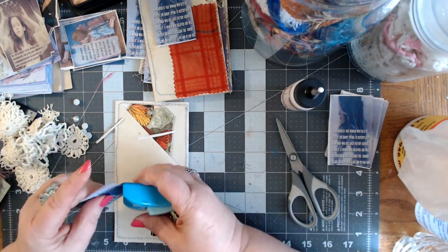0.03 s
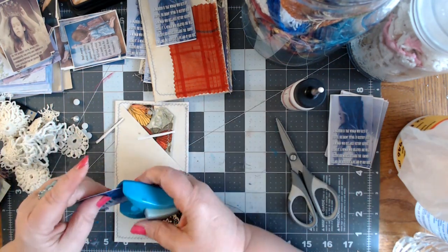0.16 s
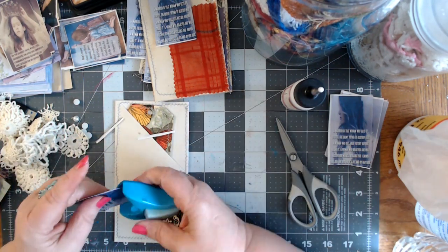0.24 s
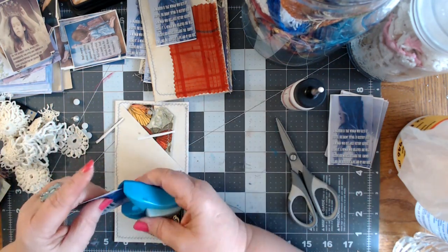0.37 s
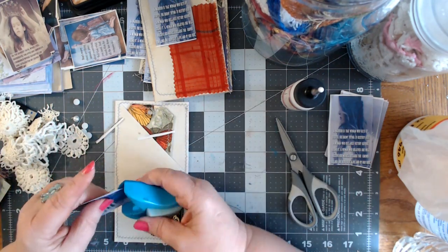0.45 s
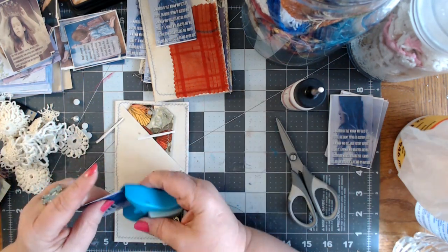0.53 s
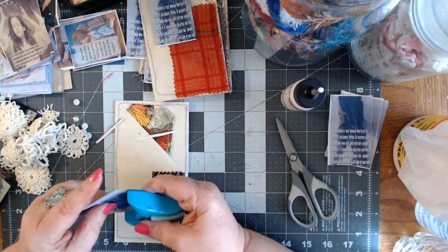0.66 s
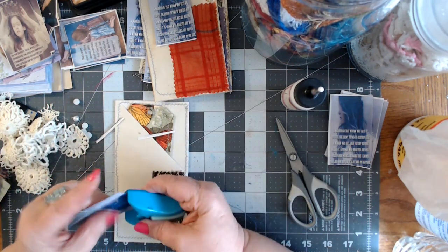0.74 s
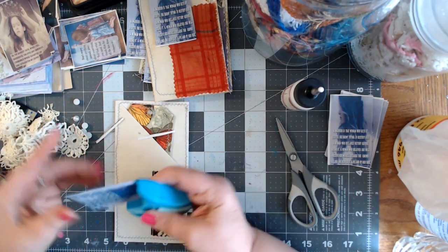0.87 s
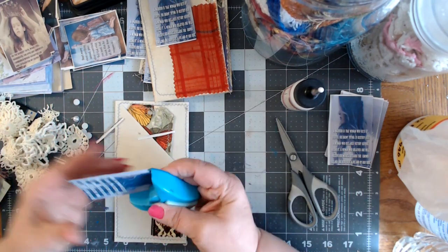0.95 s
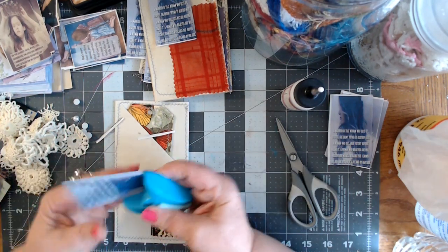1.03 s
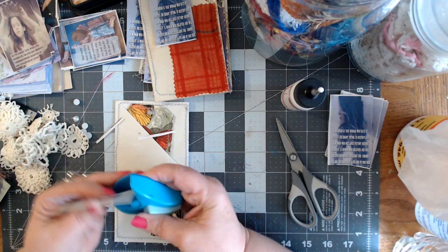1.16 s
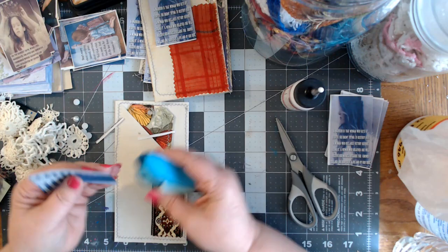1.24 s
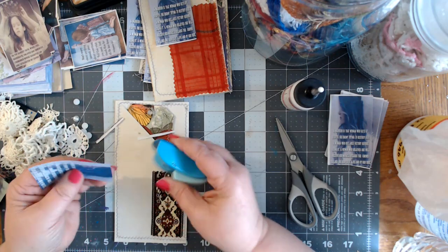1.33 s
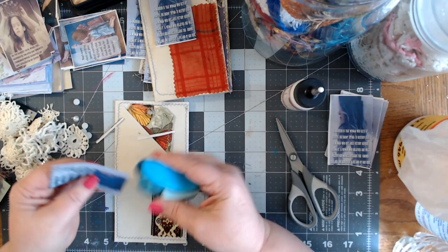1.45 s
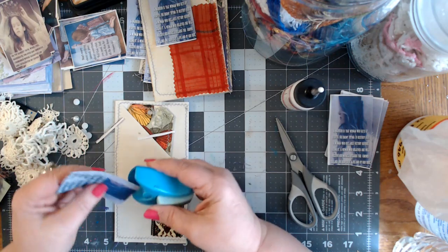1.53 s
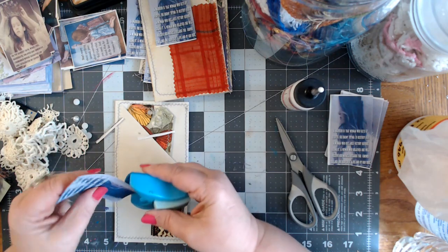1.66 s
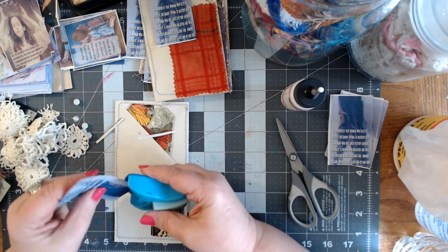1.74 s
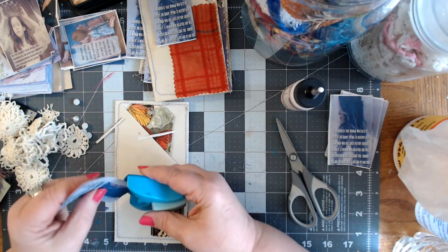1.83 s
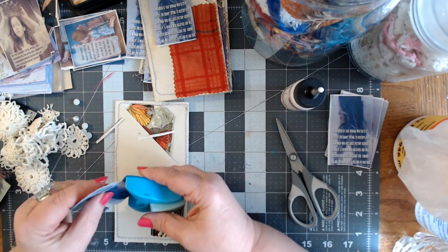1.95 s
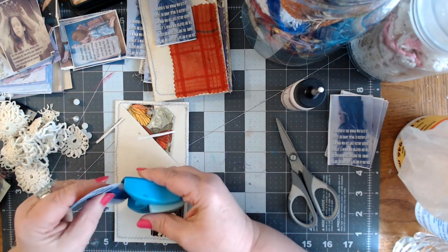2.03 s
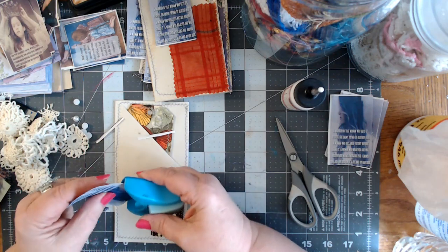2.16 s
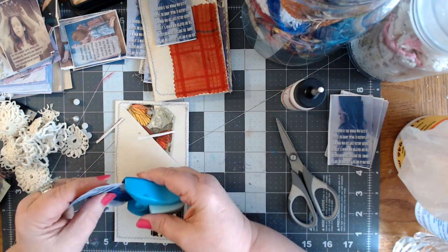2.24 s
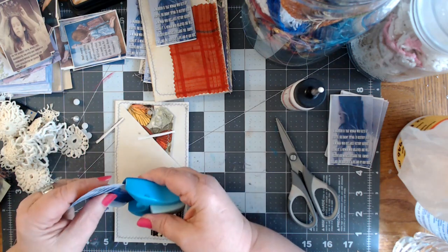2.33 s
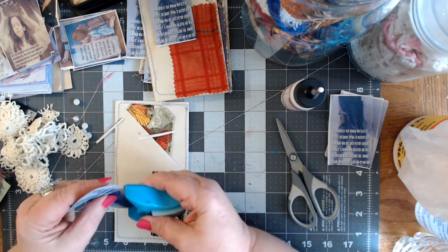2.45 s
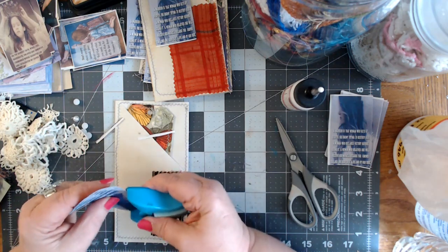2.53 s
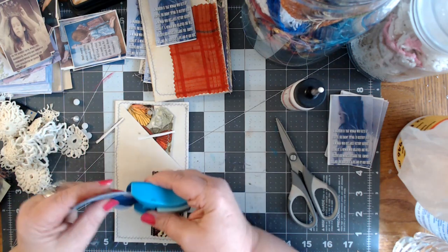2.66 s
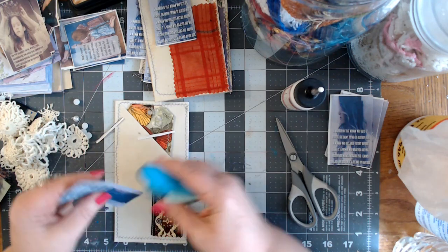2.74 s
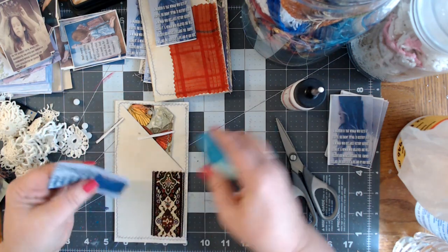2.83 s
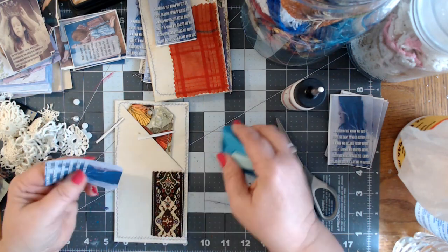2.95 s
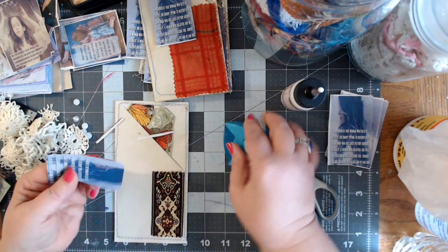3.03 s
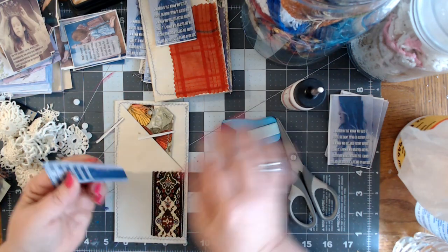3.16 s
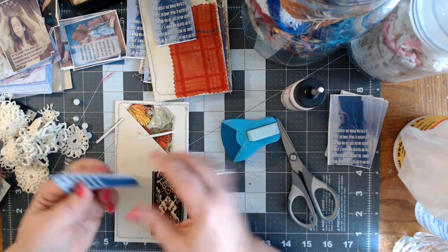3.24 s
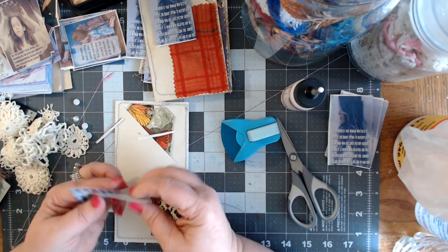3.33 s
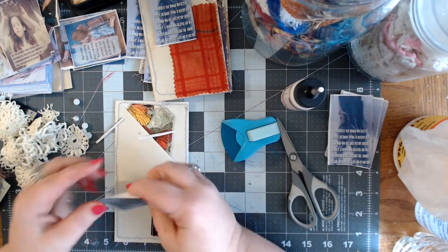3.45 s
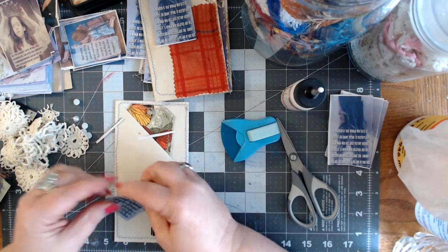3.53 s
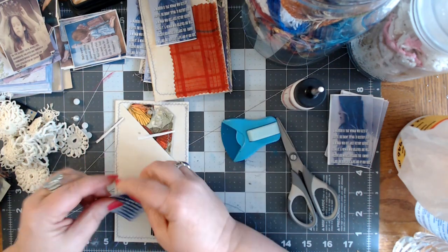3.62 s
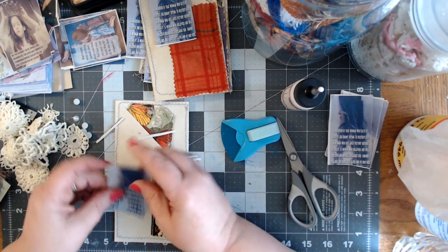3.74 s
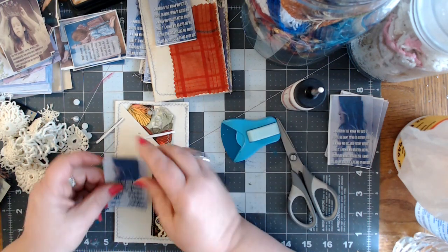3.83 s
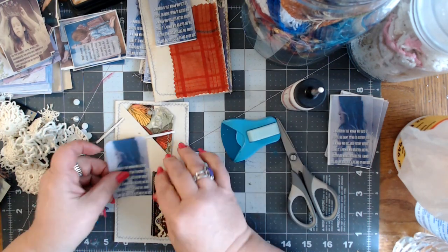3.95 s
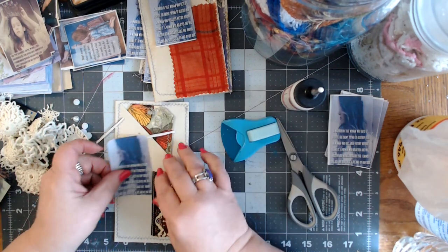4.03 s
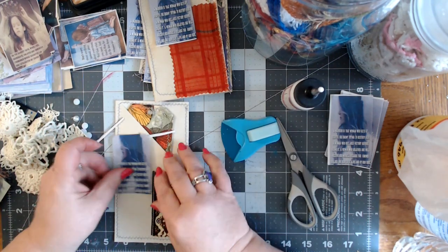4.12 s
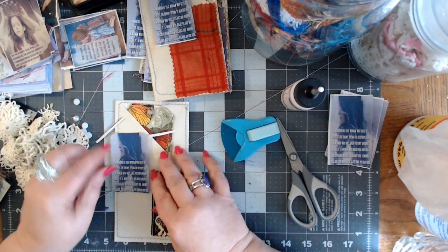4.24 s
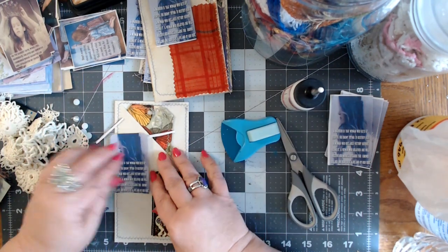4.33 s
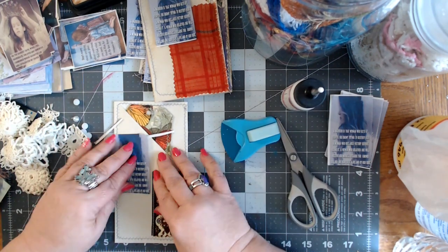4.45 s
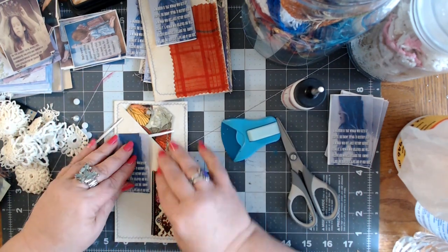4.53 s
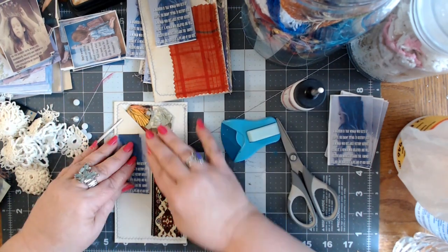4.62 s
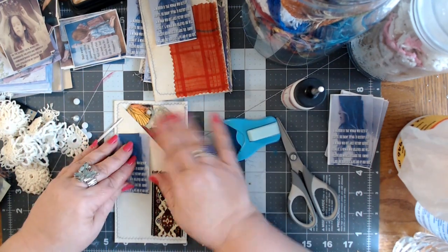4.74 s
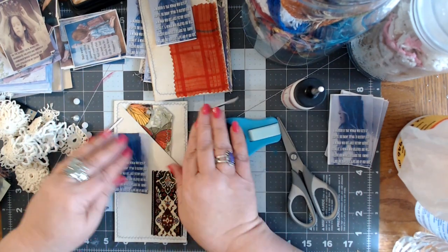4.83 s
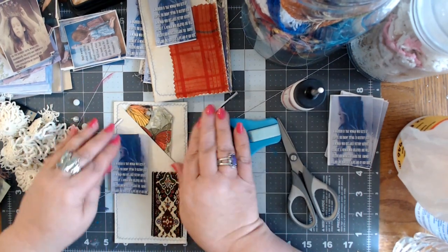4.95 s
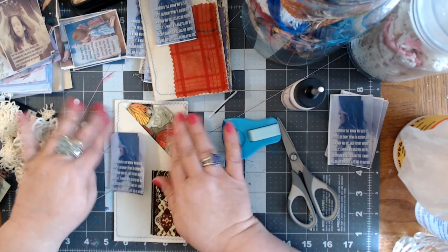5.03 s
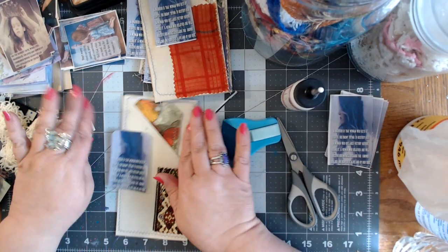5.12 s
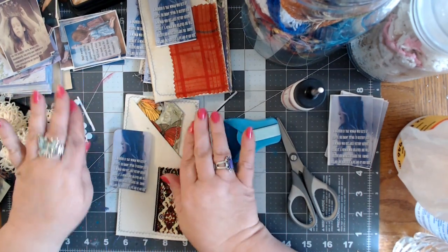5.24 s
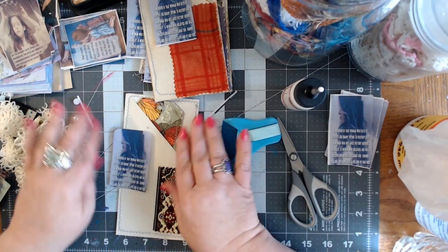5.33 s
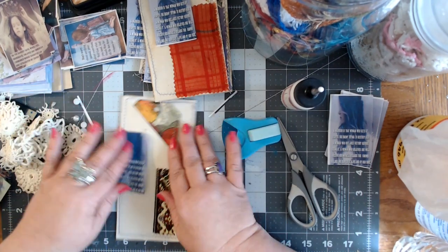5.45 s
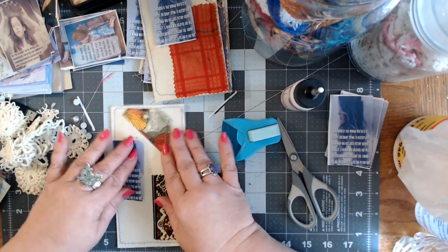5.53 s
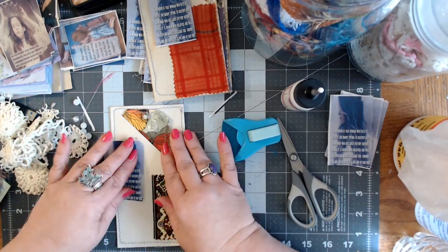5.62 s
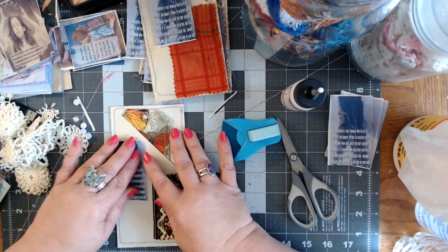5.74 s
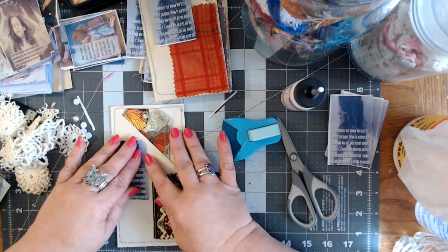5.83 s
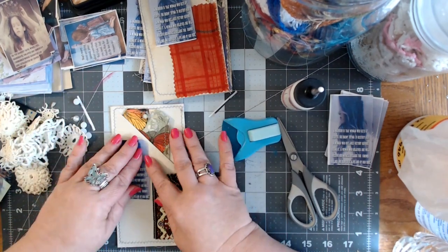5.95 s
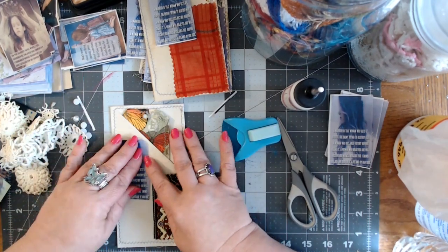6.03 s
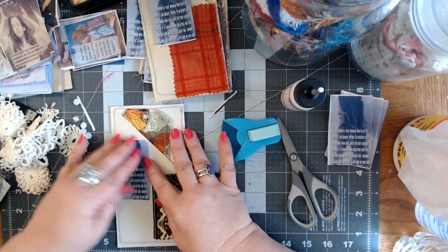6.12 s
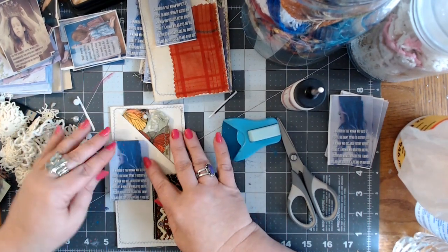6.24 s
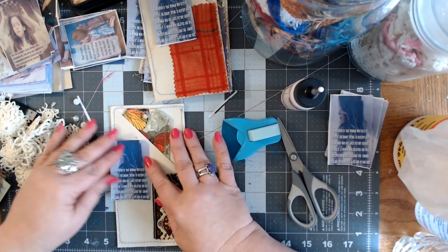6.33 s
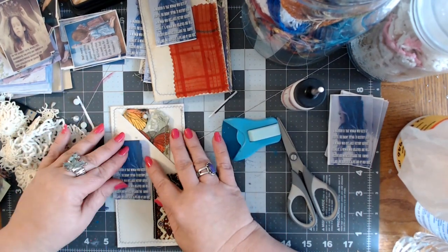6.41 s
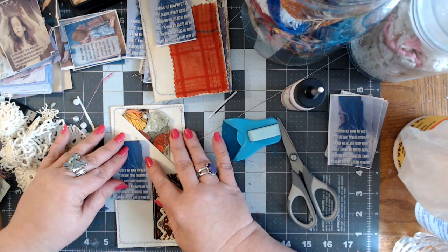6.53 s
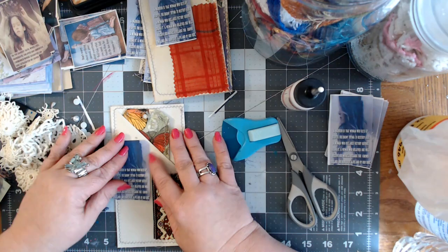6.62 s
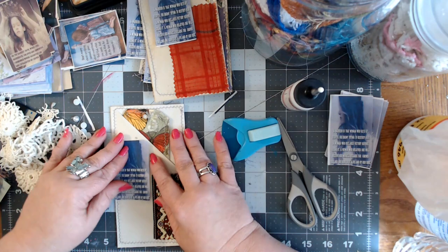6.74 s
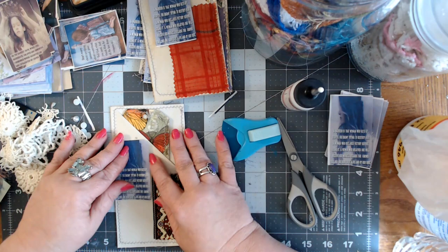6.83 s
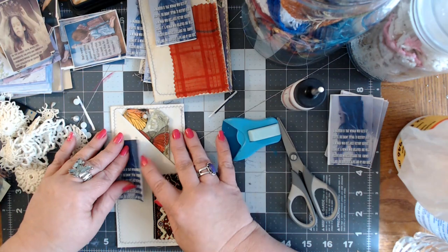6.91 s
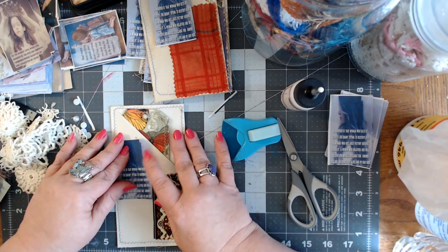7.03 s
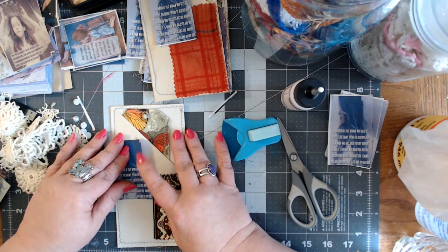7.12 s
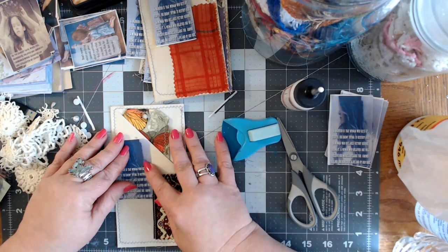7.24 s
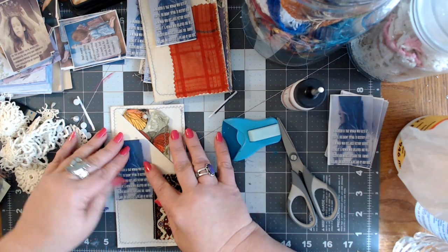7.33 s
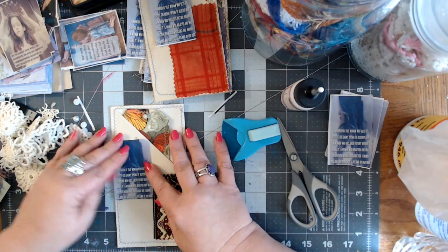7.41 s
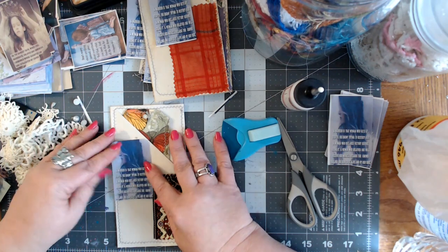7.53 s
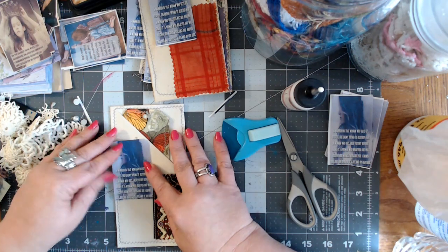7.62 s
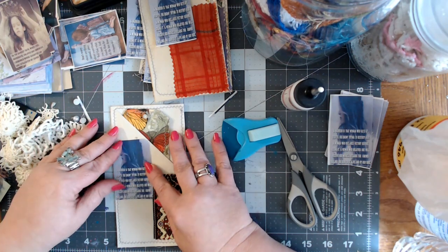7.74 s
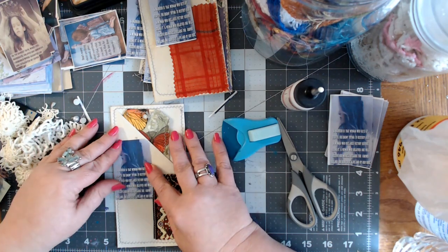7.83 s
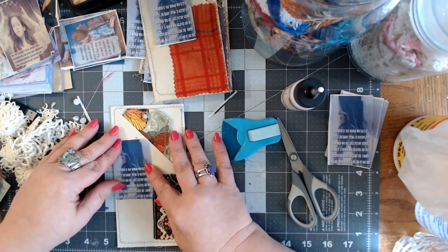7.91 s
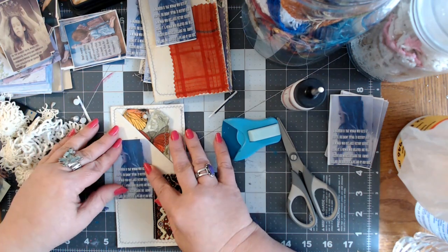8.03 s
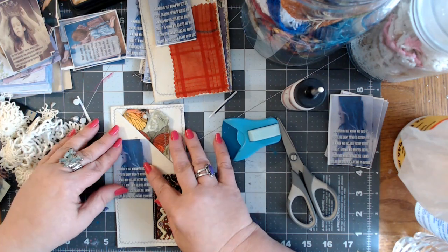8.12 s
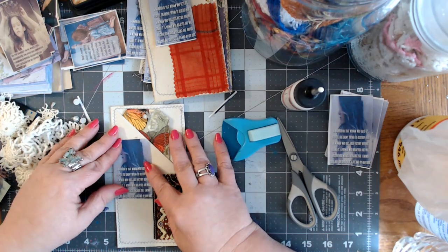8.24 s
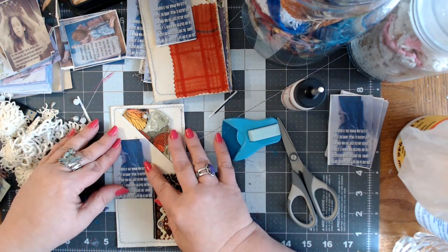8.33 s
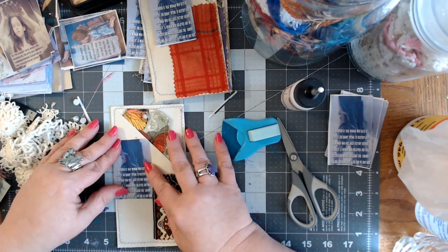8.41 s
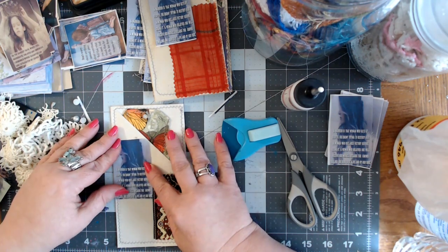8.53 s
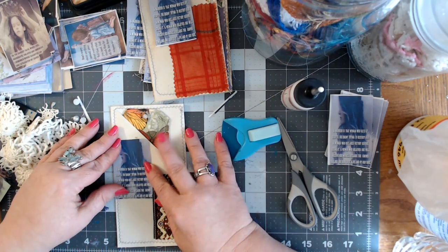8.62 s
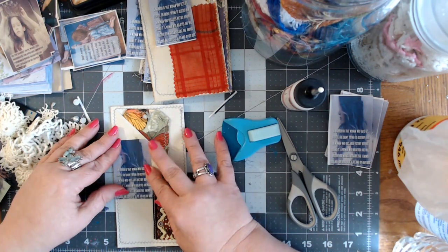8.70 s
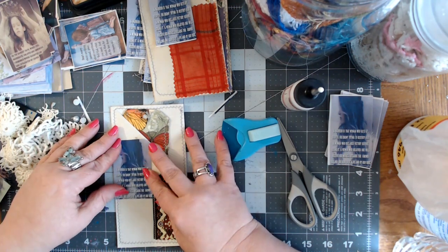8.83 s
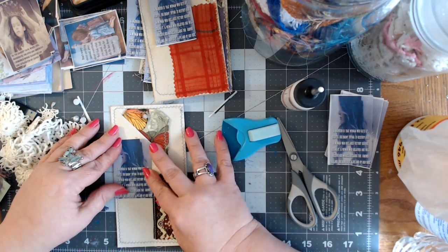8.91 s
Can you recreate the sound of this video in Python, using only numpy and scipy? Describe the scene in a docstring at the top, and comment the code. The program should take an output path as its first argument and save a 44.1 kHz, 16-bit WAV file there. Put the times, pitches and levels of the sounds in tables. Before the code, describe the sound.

Two hard punch snaps with small lever clicks, a rattling drop on a tabletop, then quiet paper rustles and finger pats over faint hiss and hum.

```python
"""Over steady hiss, rumble and fan hum, a plastic corner punch creaks and snaps sharply twice, then clatters
onto a craft table; paper slides over fingers and card, with ticks and soft pats, in a small furnished room.
Broadband contact bursts excite resonant modes of lever, steel die, shell, spring and air space; the table rings
as decaying sines, and paper is shaped noise with scattered fibre clicks. Contacts get early and late room
reflections, except the table's ring, which is added dry; the wide-band noises run continuously."""
import sys
import numpy as np
from scipy import signal
from scipy.fft import rfft, irfft, next_fast_len
from scipy.io import wavfile
from scipy.ndimage import uniform_filter1d, map_coordinates

SR = 44100
rng = np.random.default_rng(int(sys.argv[2]) if len(sys.argv) > 2 else 0)


def wav_out(sig):
    """Save sig, one row per channel (or a flat mono array), as 16-bit PCM at SR to the path in sys.argv[1]."""
    wavfile.write(sys.argv[1], SR, np.round(np.clip(np.atleast_2d(sig).T, -1, 1) * 32767).astype(np.int16))


N = 395577
SPAN = SR // 2  # samples given to one contact and its room answer


def amp(db):
    """Decibel law: level in dB to linear gain."""
    return 10 ** (np.asarray(db) / 20)


def unit(x):
    """Power normalisation: scales to rms 1."""
    return x / np.sqrt(np.mean(x ** 2) + 1e-20)


def peak(x):
    """Amplitude normalisation: scales to peak 1."""
    return x / np.abs(x).max()


def along(points, hz):
    """Logarithmic pitch scale: interpolates (Hz, value) points, holding the end values."""
    point_hz, values = np.transpose(points)
    return np.interp(np.log(hz + 1), np.log(point_hz + 1), values)


def curves(rows):
    """Linear interpolation in time: one value per sample for each column after the time."""
    times_s, *columns = np.transpose(rows)
    return [np.interp(np.arange(N) / SR, times_s, column) for column in columns]


def wobble(rate):
    """Slow random modulation: a smooth curve through normal knots, rate knots a second."""
    knots = rng.standard_normal(int(N * rate / SR) + 4)
    return map_coordinates(knots, [np.arange(N) * rate / SR])


def filtered(x, response):
    """Linear filtering: multiplies the spectrum by a complex response of frequency."""
    m = next_fast_len(len(x) + 4096)
    return irfft(rfft(x, m) * response(np.fft.rfftfreq(m, 1 / SR)), m)[:len(x)]


def noise(spectrum, size=N):
    """Spectral shaping: white noise through (Hz, dB) points, rms 1."""
    return unit(filtered(rng.standard_normal(size), lambda hz: amp(along(spectrum, hz))))


def coloured(x, spectrum):
    """Spectral shaping: a sound through (Hz, dB) points, peak 1."""
    return peak(filtered(x, lambda hz: amp(along(spectrum, hz))))


def resonances(modes):
    """Modal superposition: sums damped second-order (Hz, width Hz, dB) modes of alternating sign."""
    def response(f):
        total = 0
        for k, (hz, width, db) in enumerate(modes):
            mode = 1j * f * width / (hz * hz - f * f + 1j * f * width)
            total = total + (-1) ** k * amp(db) * mode
        return total
    return response


def contact(length):
    """Broadband excitation: a grainy scraping burst that drives all frequencies about evenly."""
    grit_db = 7  # a contact is a cluster of uneven grains
    t = np.arange(2048) / SR
    # quick rise, then a steepening fall: 60 dB down at `length` seconds
    shape = (1 - np.exp(-t / 0.00071)) * amp(-60 * (t / length) ** 1.7)
    grains = shape * rng.standard_normal(len(t)) * amp(grit_db * rng.standard_normal(len(t)))
    spectrum = rfft(grains)
    even = irfft(spectrum / (np.abs(spectrum) + 1e-9))
    burst = shape ** 0.3 * even  # a gentler copy of the envelope after the spectrum is flattened
    return np.pad(burst, (0, SPAN - len(t)))


def rung(length, modes, shift=0.02):
    """Forced modal response: a contact rings modes that vary a little at random from hit to hit; peak 1."""
    spread_db = 2.2  # spread of mode strength; shift is the relative spread of pitch
    varied = [(hz * rng.normal(1, shift), width, db + rng.normal(0, spread_db)) for hz, width, db in modes]
    low_hz, high_hz = modes[0][0] * 0.78, modes[-1][0] * 1.4

    def response(f):
        skirts = 1j * f / (low_hz + 1j * f) * high_hz / (high_hz + 1j * f)
        return resonances(varied)(f) * skirts ** 2
    return peak(filtered(contact(length), response))


def add(track, s, sound):
    """Room reverberation: places a sound at s with scattered early reflections and a diffuse decaying tail."""
    # near surfaces: delay_s, level_db
    near_surfaces = [(.0085, -16), (.011, -19.5), (0.017, -17), (.022, -25.5), (.033, -23.5)]
    # reverberation time: pitch_hz, t60_s
    decay_times = [(200, 0.31), (1000, 0.22), (4000, 0.25), (10000, 0.2), (13000, 0.17), (16000, 0.082)]
    # the wider room answers weaker and longer than the table's corner
    late_db, late_longer = -12.5, 1.9
    hz, t, z = signal.stft(rng.standard_normal(SPAN), SR, nperseg=256)
    fall_db = -60 * t / along(decay_times, hz)[:, None]
    decay = np.hypot(amp(fall_db), amp(late_db + fall_db / late_longer))
    tail = signal.istft(z * decay, SR, nperseg=256)[1][:SPAN]
    tail *= 1 - np.exp(-np.arange(SPAN) / SR / 0.00034)  # the diffuse field builds up
    room = amp(-11.5) * tail / np.linalg.norm(tail)
    room[0] = 1  # direct sound
    for delay_s, level_db in near_surfaces:
        scatter = rng.standard_normal(160) * np.exp(-np.arange(160) / 40)
        room[round(delay_s * SR):][:160] += amp(level_db) * scatter / np.linalg.norm(scatter)
    track[round(s * SR):][:SPAN] += signal.fftconvolve(sound, room)[:SPAN]


def struck(db, treble_db, shell_db, length):
    """Impact excitation: a contact snaps, cracks in the lever, fizzes in the steel die and rings the shell."""
    # lever and housing modes: pitch_hz, width_hz, level_db
    lever_modes = [(2200, 2900, -4.5), (3250, 91, -2), (3450, 880, 0.5), (3780, 180, -2), (4080, 200, -4),
                   (5300, 310, -2.5), (4700, 1400, -6.5), (5500, 310, -5), (7840, 5100, -8)]
    # steel die modes: pitch_hz, width_hz, level_db
    die_modes = [(6060, 380, 1), (7120, 130, 2), (7160, 1500, 2), (8600, 650, 4), (9450, 180, 1),
                 (9900, 78, 1.5), (9860, 360, 1), (11170, 460, -4.5), (11140, 140, -5), (13000, 5000, -9.5),
                 (17300, 340, -12)]
    # plastic shell modes: pitch_hz, width_hz, level_db
    shell_modes = [(1090, 130, 2.5), (1177, 270, 0), (1276, 64, 0.5), (1403, 90, -4), (1690, 250, 1.5),
                   (1840, 120, 1), (1860, 71, -0.5)]
    # unresonant part of a contact: pitch_hz, level_db
    snap_colour = [(300, -31.5), (1200, -8), (2500, -0.5), (7000, 0), (16000, -8.5)]
    snap_db = -8
    # a contact that spares the die leaves mostly this band of the lever
    soft_hz, soft_width_hz, soft_share = 3170, 2200, 0.44
    soft_db = min(treble_db, 0)
    kept = amp(soft_share * soft_db)

    def lever_band(f):
        return kept + (1 - kept) * resonances([(soft_hz, soft_width_hz, 0)])(f) ** 2

    snap = amp(snap_db + soft_db) * coloured(contact(length), snap_colour)
    crack = filtered(rung(length, lever_modes), lever_band)
    fizz = amp(treble_db) * rung(length, die_modes)
    shell = amp(shell_db) * rung(length, shell_modes)
    return amp(db) * (snap + crack + fizz + shell)


def patchy(spectrum):
    """Time-varying spectrum: coloured noise whose bands swell and sink each on their own; rms 1."""
    patchy_db = 2
    z = signal.stft(noise(spectrum), nperseg=256)[2]
    across_pitch = uniform_filter1d(rng.standard_normal(z.shape), size=5, axis=0)
    field = uniform_filter1d(across_pitch, size=9, axis=1)
    return unit(signal.istft(z * amp(patchy_db * unit(field)), nperseg=256)[1][:N])


def fibres(spectrum):
    """Random impulse train: single fibres let go as scattered tiny clicks of uneven size, rms 1."""
    fibres_per_s, spread_db = 2000, 3.5
    letting_go = rng.random(N) < fibres_per_s / SR
    clicks = letting_go * rng.standard_normal(N) * amp(spread_db * rng.standard_normal(N))
    return unit(filtered(clicks, lambda hz: amp(along(spectrum, hz))))


def background():
    """Random noise: steady hiss and rumble, narrow-band fan hums and the uneven rumble of a shaken stand."""
    # hiss and rumble colour: pitch_hz, level_db
    floor_colour = [(12, -35), (20, -2), (37, -5), (58, -10.5), (96, 1), (164, -11), (264, -10), (321, -22),
                    (360, -12), (596, -15.5), (882, -14), (2350, -22.5), (6000, -31.5), (15500, -32),
                    (16300, -38.5)]
    # narrow noisy fan hums: pitch_hz, width_hz, level_db
    fan_hums = [(80, 64, -72), (855, 27, -74.5)]
    # hands shifting on the table shake the microphone stand: time_s, level_db
    shake_levels = [(0.0, -68.5), (1.1, -62), (1.27, -74), (2.1, -70.5), (2.4, -58), (2.65, -70),
                    (3.1, -56.5), (3.6, -65), (4.84, -64), (5.07, -66.5), (5.8, -68.5), (6.2, -60),
                    (6.44, -69), (7.19, -71.5), (7.6, -69.5), (8.97, -72)]
    # shaken stand colour: pitch_hz, level_db
    stand_colour = [(20, -0.5), (30, 0), (60, -0.5), (100, -6), (200, -36.5), (600, -80)]
    hums = np.zeros(N)
    for hz, width, db in fan_hums:
        hums += amp(db) * unit(filtered(rng.standard_normal(N), resonances([(hz, width, 0)])))
    shake = amp(curves(shake_levels)[0] + 4.4 * wobble(8.3)) * noise(stand_colour)
    return amp(-65.0) * noise(floor_colour) + hums + shake


def rubbing():
    """Stick-slip friction: fluttering noise of catching fibres; each stroke has its mix of dull and bright."""
    # paper over fingers and card: fastest_s, level_db, swell_s, fade_s, bright_share (0-1)
    strokes = [(0.4, -45.5, 0.041, 0.078, 0.5), (0.502, -70.5, 0.46, 0.062, 0.3),
               (0.946, -59.5, 0.055, 0.022, 0.1), (.965, -48, 0.017, 0.032, 0.7),
               (1.031, -48, 0.033, 0.047, 0.1), (1.596, -56, 0.039, 0.045, 0.17),
               (2.291, -49, 0.018, 0.17, 0.67), (1.08, -87, .06, 0.13, 0.3), (1.218, -63, 0.24, 0.41, 0.94),
               (1.358, -61, 0.33, 0.086, 0.35), (1.751, -62.5, 0.078, 0.19, 0.22),
               (1.894, -61, 0.26, 0.047, 0.24), (2.42, -56, 0.065, 0.041, 0.6),
               (2.554, -51, 0.27, .05, 0.42), (2.793, -58, 0.24, 0.21, 0.77), (3.11, -66, 0.074, 0.24, 0.2),
               (3.216, -69.5, 0.11, 0.044, 0.17), (3.289, -51, 0.12, 0.14, 0.68),
               (3.43, -58.5, 0.042, 0.24, 0.25), (3.492, -60, 0.13, 0.058, 0.6),
               (3.613, -61.5, 0.14, 0.13, 0.3), (3.808, -66.5, 0.26, .2, 0),
               (3.93, -54.5, 0.13, 0.065, 0.83), (4.176, -67, .05, 0.064, 0.94),
               (4.27, -66, 0.039, 0.055, 0.57), (4.335, -63.5, 0.024, 0.062, 0.49),
               (4.51, -58.5, 0.041, 0.1, 0.33), (4.578, -40, 0.062, 0.069, 0.89),
               (4.615, -48, 0.086, 0.017, 1), (4.85, -60.5, 0.014, 0.19, 0.68),
               (4.93, -53.5, 0.1, 0.091, 0.72), (4.985, -54, 0.068, 0.044, 0.6),
               (5.24, -71.5, 0.065, 0.086, 0.25), (5.331, -60.5, 0.045, 0.22, 0.63),
               (5.4, -54.5, 0.18, 0.061, 0.83), (5.64, -69, 0.25, 0.3, .9), (5.894, -69, 0.064, 0.38, 0.35),
               (6.201, -68.5, 0.048, 0.18, 0.13), (6.238, -72, 0.14, 0.054, 0.6),
               (6.505, -62.5, 0.055, 0.093, 0.85), (6.782, -54, 0.03, 0.046, 0.2),
               (6.865, -58.5, 0.035, 0.047, 0), (6.896, -49.5, 0.036, 0.041, 0.53),
               (7.094, -59.5, 0.017, 0.035, 0.5), (7.184, -67.5, 0.042, 0.12, 0.88),
               (7.539, -74.5, .05, .3, 0.56), (7.809, -69.5, 0.041, 0.057, 0.7),
               (7.884, -74, 0.0604, 0.17, 0.78), (8.094, -70, 0.051, 0.088, .7),
               (8.6, -71.5, 0.14, 0.32, 0.6)]
    # faint low-mid rustle during the handling: time_s, level_db
    rustle_levels = [(0.0, -68.5), (0.31, -73), (0.5, -66.5), (0.72, -69), (.9, -81.5), (.96, -49.5),
                     (1.08, -78), (1.15, -89), (1.4, -93.5), (1.594, -75), (1.75, -91.5), (1.8, -70),
                     (1.896, -65.5), (2.006, -100), (2.25, -78), (2.46, -75), (2.554, -61), (2.6, -88),
                     (2.794, -77), (2.9, -110)]
    # rustle colour: pitch_hz, level_db
    rustle_colour = [(80, -60), (200, -24.5), (420, 7.5), (800, -3.5), (1600, 0), (2500, -11),
                     (4000, -19.5), (8000, -58.5)]
    # dull paper colour: pitch_hz, level_db
    dull_colour = [(290, -38.5), (600, -11), (1500, -1.5), (2000, -6), (2900, -1), (3800, -3), (5500, -8),
                   (8400, -8.5), (11000, -15), (16300, -24.5)]
    # bright paper colour: pitch_hz, level_db
    bright_colour = [(290, -54.5), (600, -24), (1500, -13), (3200, -9.5), (5500, -7), (7000, -3.5),
                     (8600, 0), (10500, -2.5), (13000, -8), (16300, -13.5)]
    edge_db = 20  # a stroke gains this over its swell and loses it over its fade
    restless_db = -80  # paper never lies quite still under the fingers
    fibre_db = -4  # fibre clicks against the smooth slide
    t = np.arange(N) / SR
    power = np.full((2, N), amp(restless_db) ** 2 / 2)  # rows: dull, bright
    for fastest_s, db, swell_s, fade_s, share in strokes:
        away = np.maximum((fastest_s - t) / swell_s, (t - fastest_s) / fade_s)
        power += np.array([[1 - share], [share]]) * amp(db - edge_db * away) ** 2
    flutter = unit(amp(2.1 * wobble(44) + 1.3 * wobble(180)))
    dull = unit(patchy(dull_colour) + amp(fibre_db) * fibres(dull_colour))
    bright = unit(patchy(bright_colour) + amp(fibre_db) * fibres(bright_colour))
    slide = flutter * np.sum(np.sqrt(power) * [dull, bright], axis=0)
    rustle = amp(curves(rustle_levels)[0] + 1.7 * wobble(30)) * patchy(rustle_colour)
    return slide + rustle


def punch():
    """Cavity and spring resonance: die snaps and creaks in the hand, a low hollow knock and spring twangs."""
    # die snaps, lever creaks, paper nudged in its slot; treble, shell and hollow are relative to the crack:
    # start_s, crack_db, treble_db, shell_db, hollow_db, contact_s
    contacts = [(0.0824, -58.5, -4, 7, 3, 0.011), (0.1744, -50.5, -9, -8, -4, 0.011),
                (0.1951, -37, 1, -6.5, -19, 0.0076), (0.2928, -41.5, -3, -16, -18, 0.0079),
                (0.3317, -35, -9, -10, -25, 0.009), (0.3675, -35, 6, -13, -12, 0.0072),
                (0.3765, -29.5, -0.5, -11.5, -13, 0.016), (0.3908, -36, 3, -6, -7, 0.0092),
                (0.4053, -32, 2, -4.5, -6.5, 0.012), (0.522, -25, -2, 11.5, 6, 0.0052),
                (0.5242, -2.5, 3.5, -12.5, -25, 0.006), (0.5261, -8.5, -2, -10, -16, 0.0054),
                (0.5336, -21, 13, 3, -32, 0.018), (0.552, -31, 11, -4, -18, 0.0086),
                (0.664, -50.5, -13, 0.5, 6.5, 0.018), (0.9532, -37.5, 4.5, -22, 5, 0.015),
                (0.9625, -45, 5, -16.5, 4, .01), (0.9797, -23, -23, -22, -19, 0.015),
                (0.9845, -26, -19, -16, -14, .008), (0.9873, -48, -13, 2, 4, 0.017),
                (1.004, -24.5, -2.5, -9.5, -32, 0.0087), (1.0122, -24.5, -17, -11, -8, 0.0061),
                (1.0166, -11, -26, -26, -23, 0.0051), (1.0198, -14, -19, -21, -27, 0.0054),
                (1.036, -43, -12, -15, -20, 0.0059), (1.0502, -17.5, -21, -20, -17.5, 0.0092),
                (1.06, -37, -15, -10, -15, 0.0064), (1.07, -51, -12, -12, -17, 0.007),
                (1.173, -37.5, -16, -7, -24, 0.0078), (1.182, -42, -18, -10.5, -28, 0.0081),
                (1.3324, -43.5, -18, 2, -36.5, 0.0056), (1.342, -46.5, -15, -11, -33, .01),
                (1.346, -55.5, -14.5, -2.5, -28.5, 0.035), (1.483, -58, -21, -3, 1, 0.024),
                (1.572, -52, -17.5, -12.5, -0.5, 0.025), (1.5901, -43, -0.5, -18.5, -5.5, 0.011),
                (1.7684, -22.5, -21, -12, -18, 0.0058), (1.783, -35.5, -27, -9, -18, 0.015),
                (1.823, -54, -21, -1.5, -13, 0.068), (1.85, -51, -6, -7, -1, 0.06),
                (1.878, -54.5, -18.5, -8, -4, 0.051), (1.9063, -50, -7.5, 4.5, 8.5, 0.011),
                (2.261, -46.5, 4, -9.5, -5, 0.0086), (2.2668, -34, 4.5, -12.5, -5.5, 0.008),
                (2.286, -48.5, -4.5, 6, 11, 0.064), (2.3166, -36.5, 6, 5, 6.5, 0.0076),
                (2.3485, -24.5, 7, -3, -1, 0.02), (2.3499, -0.5, 1, -7.5, -20.5, 0.0058),
                (2.402, -43, -8, 2, -12, .012), (2.458, -30.5, -13, -11.5, -10, 0.034),
                (2.464, -31.5, -8, -14, -11, 0.016), (2.519, -45.5, -1, 0.5, 3, 0.024),
                (2.534, -50, -22, 3, 7, 0.029), (2.556, -40, -3, -5, -5, 0.0088),
                (2.5625, -25, -4, -5, -36, 0.0088), (2.571, -36, -7, -14, -24.5, 0.0053),
                (2.58, -41, -13, -13, -30, 0.0067)]
    # air space in the punch: pitch_hz, width_hz, level_db
    hollow_modes = [(316, 570, -11), (496, 51, 2.5), (720, 140, 3.5), (730, 400, 2)]
    # the hardest blows set the spring going: start_s, peak_db
    twangs = [(.525, -23), (2.351, -30.5), (2.966, -36.5)]
    # return spring modes: pitch_hz, width_hz, level_db
    spring_modes = [(3170, 14, 3), (5500, 50, 0.5)]
    track = np.zeros(N + SPAN)
    for s, db, treble_db, shell_db, hollow_db, length in contacts:
        knock = amp(db + hollow_db) * rung(length, hollow_modes)
        add(track, s, struck(db, treble_db, shell_db, length) + knock)
    for s, db in twangs:
        # the spring's pitch varies least
        add(track, s, amp(db) * rung(0.0056, spring_modes, shift=0.004))
    return track[:N]


def pats():
    """Soft impact: yielding flesh lands as a low noise puff with a slow rise."""
    # soft finger pats on the table: start_s, peak_db, pitch_hz
    landings = [(0.386, -52, 51.9), (0.83, -48.5, 51), (1.771, -53.5, 61), (2.299, -51, 390),
                (3.939, -62, 72.2), (4.605, -45.5, 202.7), (4.618, -52, 279), (4.929, -50.5, 42),
                (6.886, -52.5, 74.5), (7.459, -52, 53.7)]
    pat_cycles = 1.8  # a deeper pat presses longer
    track, t = np.zeros(N + SPAN), np.arange(SPAN) / SR
    for s, db, hz in landings:
        colour = [(hz / 8, -40), (hz / 3, -12), (hz, 0), (hz * 3, -12), (hz * 9, -40), (hz * 30, -90)]
        press = t * np.exp(-t * hz / pat_cycles)
        add(track, s, amp(db) * peak(press * noise(colour, size=SPAN)))
    return track[:N]


def drops():
    """Plate vibration: the punch lands and rattles, with a thud and decaying sine modes of the table top."""
    # landings; treble, shell, thud and table ring are relative to the crack:
    # start_s, crack_db, treble_db, shell_db, thud_db, ring_db, contact_s
    landings = [(2.8626, -19.5, 2.5, -3.5, 5, -4.5, 0.037), (2.884, -27.5, 2, -1, -11, -14, 0.022),
                (2.903, -46, 0, -9, 10, -1, .02), (2.9388, -27.5, -6, -3, -22, -32, 0.011),
                (2.964, -7, 0.5, -5.5, -3.5, -34, 0.012), (2.965, -8.5, 6.5, -13.5, -5, -5, 0.017),
                (2.998, -21, -3, -12, 5, 0, 0.041), (3.007, -33, -2, 0, 9, 0, 0.011),
                (3.1937, -49, 3, -15.5, 0, -13, 0.035), (3.2205, -40.5, -3.5, -7, -4.5, -7.5, 0.02),
                (3.237, -58.5, -9, -9, 11.5, -15, .02), (3.26, -51.5, 0, -11, 3.5, -2, 0.018)]
    # table modes: pitch_hz, level_db, t60_s
    table_modes = [(65.4, -7, .21), (127, -4.5, 0.1), (194.4, -1.5, 0.21), (261.4, -3, 0.0704),
                   (312.2, -9.5, 0.24), (322, -1, 0.06), (402, -3, 0.0753), (483, 0.5, 0.08),
                   (584.6, -1, 0.061)]
    dull_hz = 16000  # landings lose treble gently above this
    thud_delay_s = 0.003  # the thud follows the touch by 3 ms
    build_cycles = 0.72  # a table mode needs this long to start ringing
    thud_colour = [(30, -46.0), (100, -24.0), (280, 6.5), (600, -1.0), (1200, -5.5), (2000, -20.5), (5000, -59.0)]
    track, t = np.zeros(N + SPAN), np.arange(SPAN) / SR
    for s, db, treble_db, shell_db, thud_db, ring_db, length in landings:
        ring = np.zeros(SPAN)
        for hz, level_db, t60_s in table_modes:
            decay = amp(level_db + rng.normal(0, 2.1) - 60 * t / t60_s)
            ring += decay * (1 - np.exp(-t * hz / build_cycles)) * np.sin(2 * np.pi * hz * t)
        ring = coloured(ring, [(20, -59.5), (45, -20.5), (60, -0.5)])  # thinned below about 60 Hz
        thud = coloured(np.roll(contact(0.025), round(thud_delay_s * SR)), thud_colour)
        blow = filtered(struck(db, treble_db, shell_db, length), lambda f: 1 / (1 + 1j * f / dull_hz))
        add(track, s, blow + amp(db + thud_db) * thud)
        # carried through the table itself, so without the room
        track[round(s * SR):][:SPAN] += amp(db + ring_db) * ring
    return track[:N]


def ticks():
    """Impulsive buckling: paper buckles or a nail touches card, a short burst coloured around one pitch."""
    # paper and fingernail ticks: start_s, peak_db, pitch_hz, fall_db (per octave below the pitch)
    touches = [(3.449, -45.5, 8020, 7), (3.937, -21, 5500, 5.5), (3.943, -25, 3400, 2),
               (4.089, -46.5, 2765, 13), (4.501, -51, 2760, 5.5), (4.5563, -41, 7800, 6),
               (4.5665, -30.5, 7600, 7), (4.62, -42, 8010, 7), (4.8413, -53, 3990, 1.5),
               (4.9232, -34, 5934, -1.5), (4.98, -41.5, 9000, 3), (5.319, -43, 8070, 2),
               (6.7221, -45, 5920, -1), (6.901, -44, 3000, 16), (7.082, -57, 6030, 4.5),
               (7.2128, -40, 10260, 8), (7.7378, -48.5, 11280, 17), (7.8057, -50, 7500, 10),
               (8.1663, -53.5, 6660, 19), (8.244, -58.5, 4900, 22)]
    track = np.zeros(N + SPAN)
    for s, db, hz, fall_db in touches:
        # about half as steep again above the pitch
        colour = [(hz / 64, -6 * fall_db), (hz, 0), (hz * 4, -3 * fall_db)]
        add(track, s, amp(db) * coloured(contact(0.016), colour))
    return track[:N]


def scene():
    """Linear superposition: sums everything on and around the table."""
    return (background() + rubbing() + punch() + pats() + drops() + ticks())[None]


def record(dry):
    """Saturation and band limiting: rounds off the loudest peaks, then cuts steeply above the band limit."""
    top_hz = 16400
    clipped = dry[0] / (1 + np.abs(dry[0] / 1.1) ** 6) ** (1 / 6)
    return filtered(clipped, lambda hz: 1 / (1 + (hz / top_hz) ** 200))[None]


dry = scene()
out = record(dry)
wav_out(out)
```